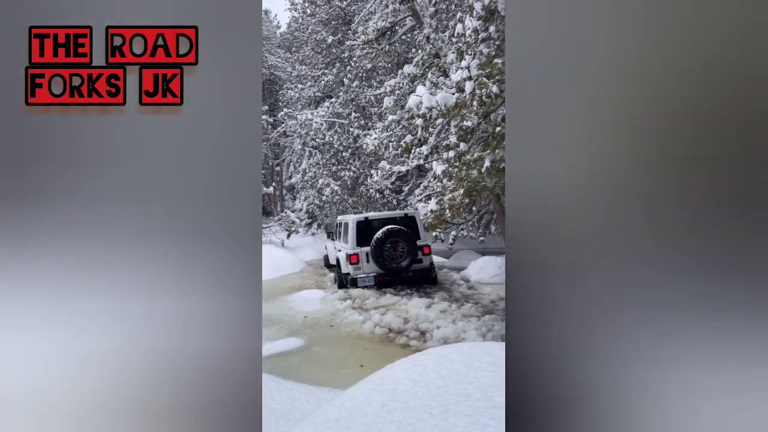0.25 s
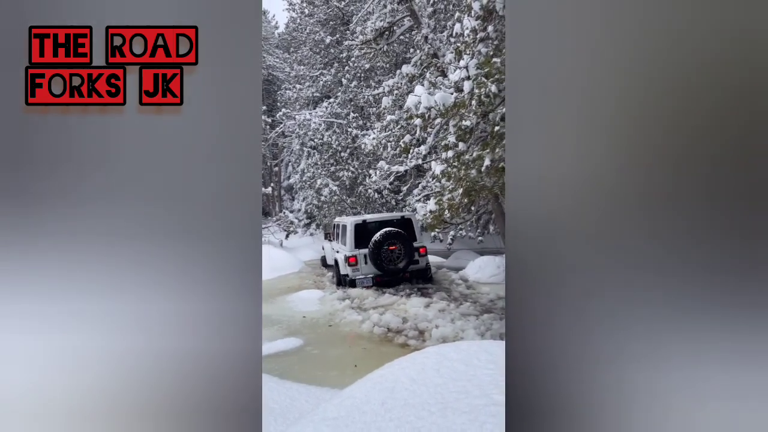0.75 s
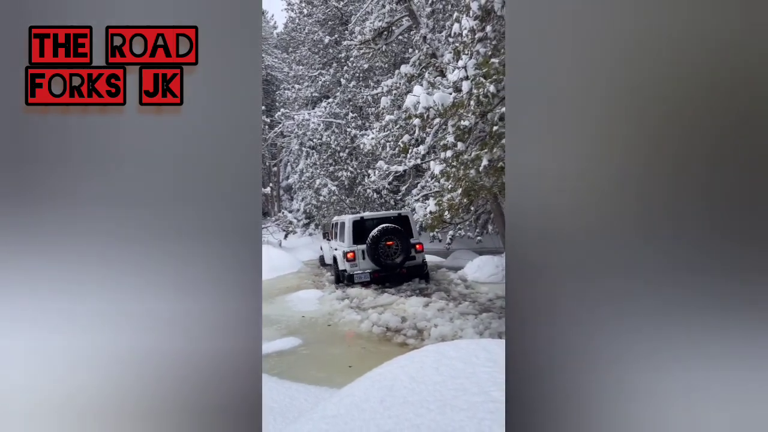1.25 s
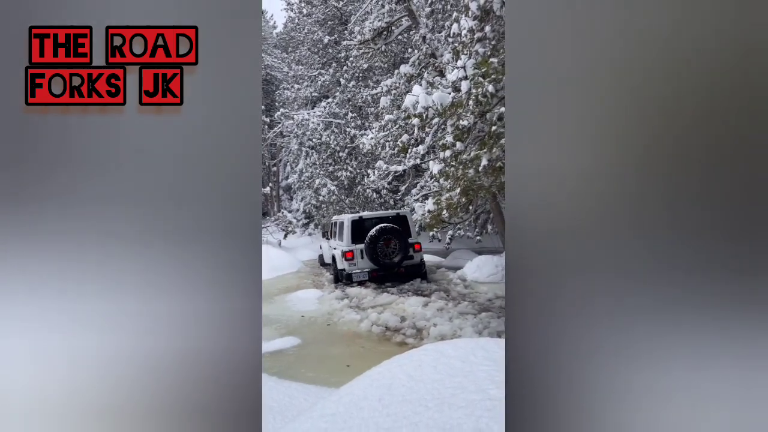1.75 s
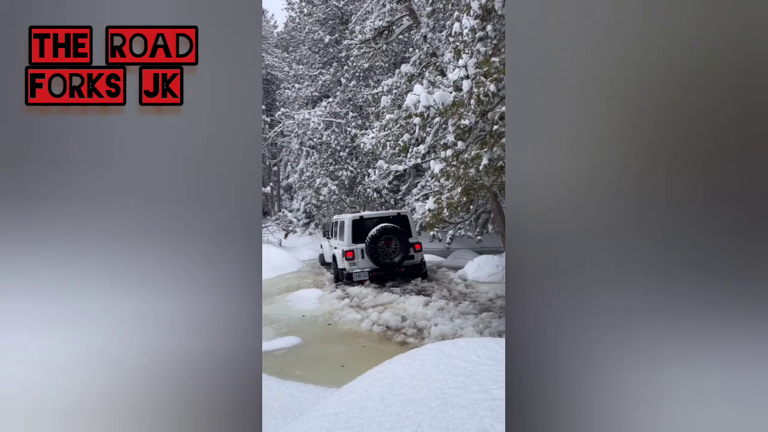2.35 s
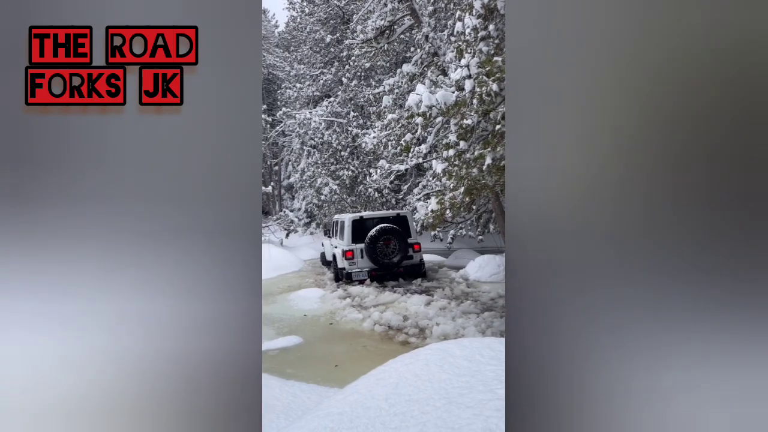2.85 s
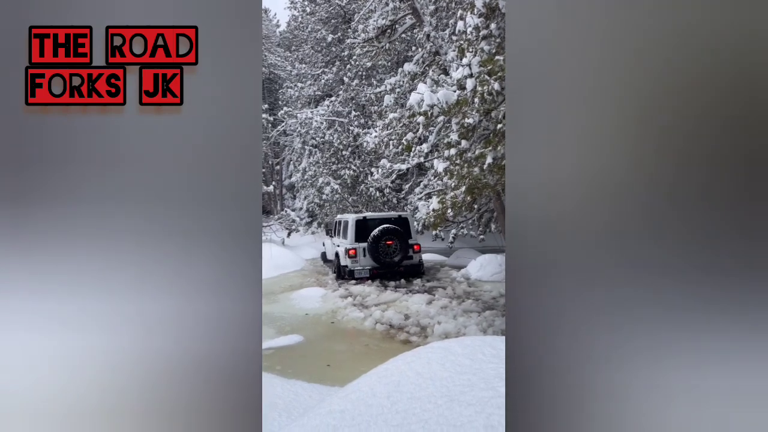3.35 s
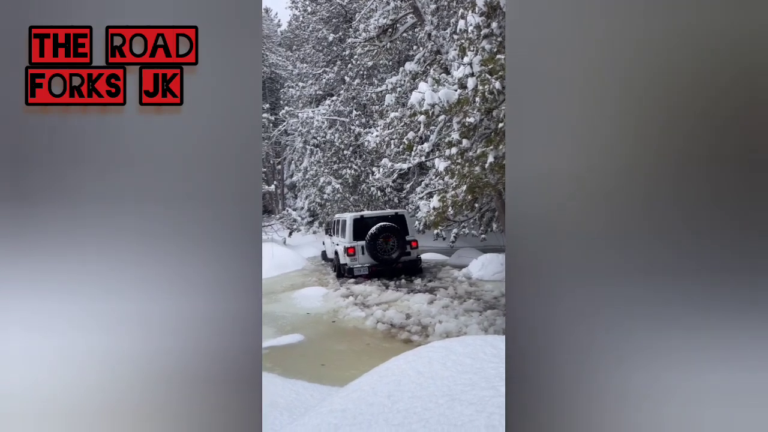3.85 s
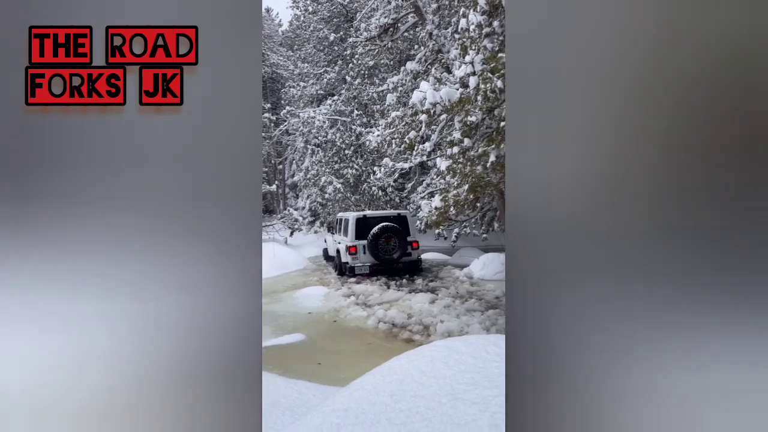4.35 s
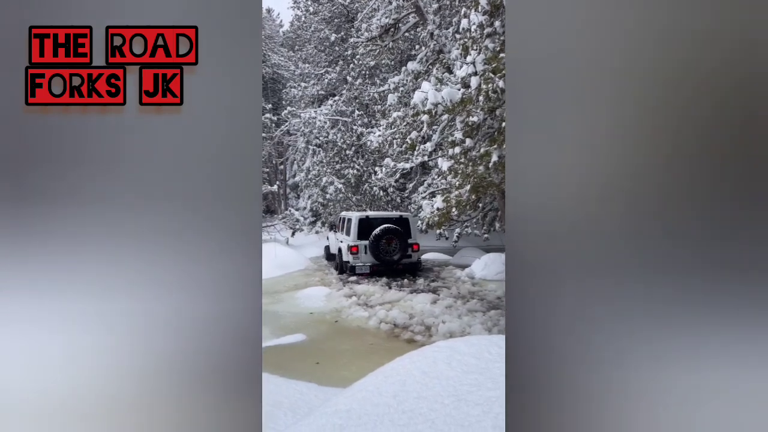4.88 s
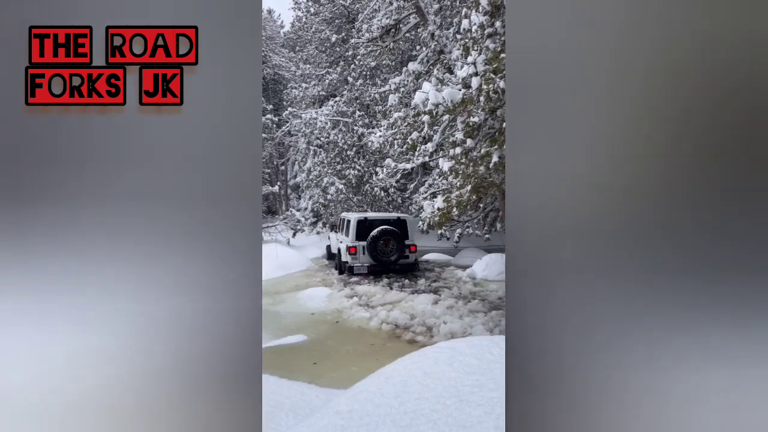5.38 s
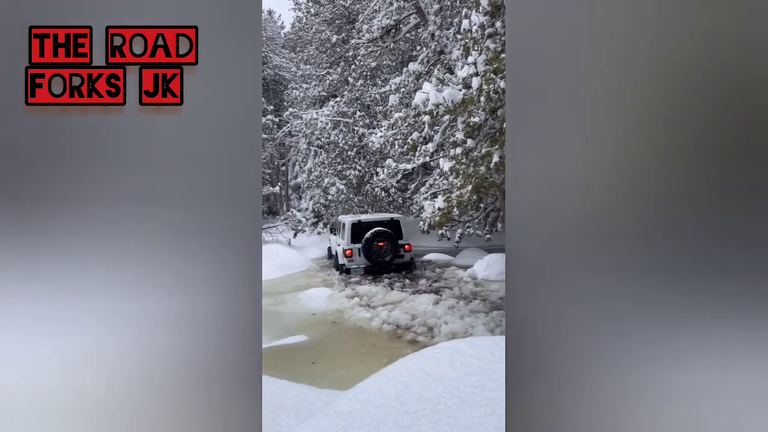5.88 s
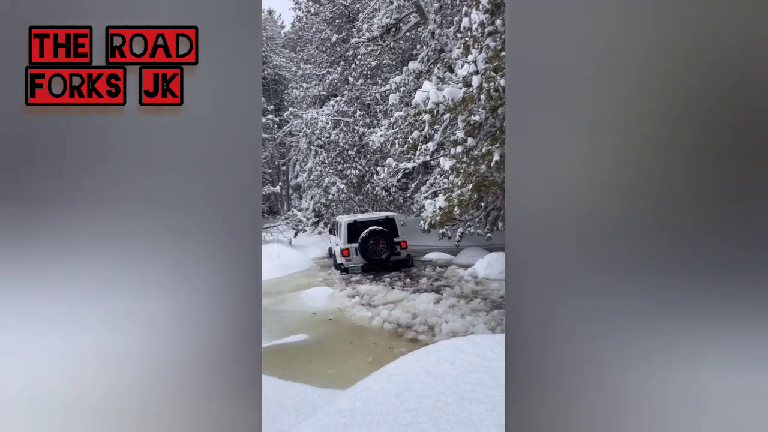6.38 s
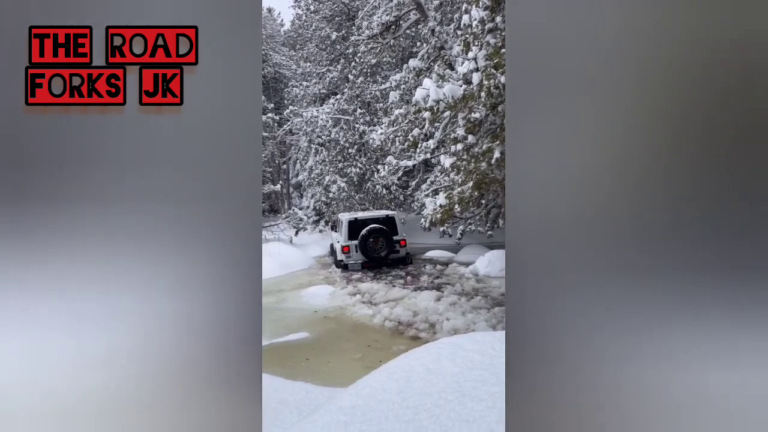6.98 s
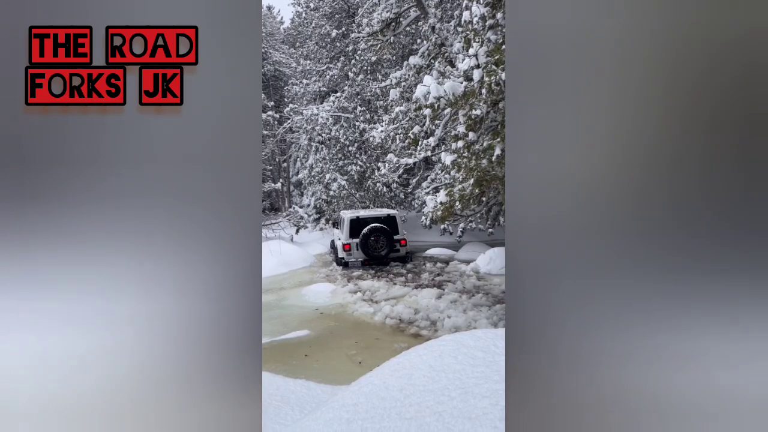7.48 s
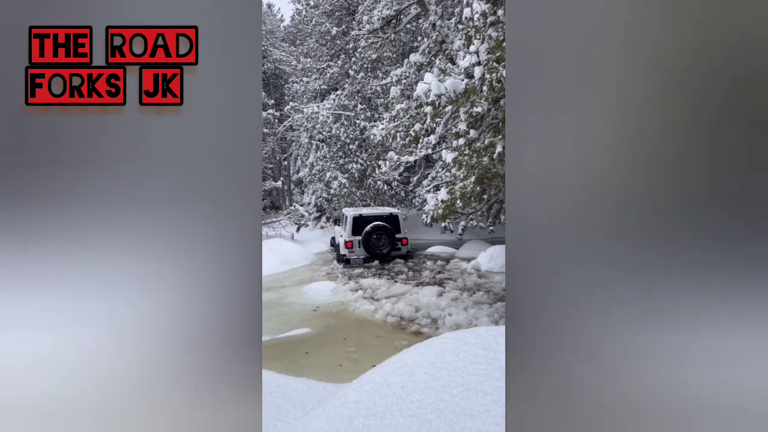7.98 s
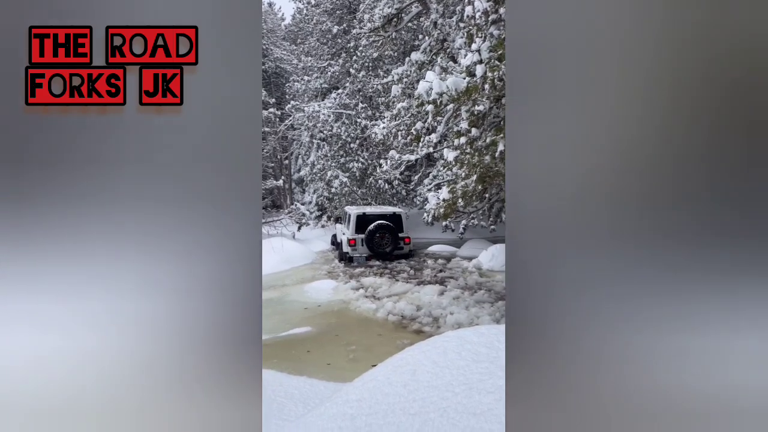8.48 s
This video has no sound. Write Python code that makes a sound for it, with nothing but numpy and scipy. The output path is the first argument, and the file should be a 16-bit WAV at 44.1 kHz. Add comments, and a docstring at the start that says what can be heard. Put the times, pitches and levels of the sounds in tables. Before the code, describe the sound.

Heard from behind in snowy woods, an off-road vehicle's low, booming engine rises and falls as it wades through icy water. One strong rev comes early, followed by a surge of splashing, bubbling slush. The engine then labours at lower speed, its exhaust burbling through waves, while broken ice clinks and snaps beneath the drone. A second rev builds at the close.

```python
"""An exhaust booms as a four-wheel-drive crawls along a flooded, half-frozen forest trail.
A pair of microphones stands on the bank behind it. The engine swells and eases, its firings
sounding through the pipe and now and then gurgling under water. The tyres churn slush into
bubbles and throw spray; cavities plop shut, and ice plates knock, clatter and crack.
The snowy trunks return a faint, short echo of the water and ice."""
import sys
import numpy as np
from scipy import signal
from scipy.fft import rfft, irfft, next_fast_len
from scipy.io import wavfile
from scipy.ndimage import uniform_filter1d

SR = 44100
rng = np.random.default_rng(int(sys.argv[2]) if len(sys.argv) > 2 else 0)


def wav_record(signal):
    """Record a signal, one row per channel, as 16-bit PCM in the file named by sys.argv[1]."""
    frames = np.transpose(np.atleast_2d(signal))
    bounded = np.clip(frames, -1, 1)
    # unit amplitude maps onto the largest positive 16-bit level
    quanta = np.round(bounded * 32767).astype(np.int16)
    wavfile.write(sys.argv[1], SR, quanta)


N = 384993
TIME = np.arange(N) / SR
FFT_SIZE, TAPS = next_fast_len(N + 8192), 16384
BIN_HZ = np.arange(FFT_SIZE // 2 + 1) * SR / FFT_SIZE
FILTER_HZ = np.arange(TAPS // 2 + 1) * SR / TAPS


# The crank. Each row: time in seconds, turns per second.
CRANK_SPEED = [(0, 30.45), (0.08, 29.78), (0.2, 31.6), (0.45, 31.85), (0.58, 29.88), (0.72, 28.52),
               (0.97, 29.14), (1.1, 28.01), (1.25, 26.64), (1.45, 25.23), (1.9, 24.38), (2.03, 26.14),
               (2.15, 28.88), (2.3, 34.68), (2.45, 39.01), (2.56, 42.2), (2.72, 42.77), (2.82, 43.43),
               (2.92, 42.62), (3.03, 39.16), (3.15, 35.53), (3.35, 30.28), (3.52, 26.71), (3.7, 25.34),
               (4.0, 25.73), (4.15, 26.92), (4.3, 30.3), (4.45, 31.09), (4.7, 29.34), (4.95, 28.53),
               (5.15, 26.14), (5.35, 27.25), (5.6, 28.4), (5.9, 29.0), (6.1, 28.18), (6.3, 27.68),
               (6.55, 29.16), (6.75, 28.82), (6.95, 27.2), (7.2, 26.37), (7.5, 29.71), (7.8, 31.16),
               (8.0, 31.74), (8.2, 33.32), (8.35, 36.75), (8.55, 42.07), (8.73, 44.72)]
# The low exhaust note, weaker where the tailpipe sinks. Each row: time in seconds, relative level in dB.
BOOM = [(0.0, -32.5), (0.7, -34.5), (1.05, -33.5), (1.55, -38), (2.0, -38), (2.22, -33), (2.45, -36),
        (2.8, -31), (3.15, -38.5), (3.4, -38), (3.9, -40.5), (4.35, -37), (4.85, -37), (5.15, -38.5),
        (5.6, -37), (5.95, -41.5), (6.35, -41.5), (6.75, -36), (7.3, -47.5), (8.1, -43), (8.45, -44),
        (8.65, -42)]
# The throttle, heard as the bark of the upper orders. Each row: time in seconds, relative level in dB.
BARK = [(0.0, -33.5), (0.55, -34), (1.0, -36), (1.3, -40), (1.85, -42), (2.25, -36), (2.75, -26.5),
        (3.2, -33), (3.55, -40), (4.0, -40.5), (4.3, -34.5), (4.8, -34.5), (5.2, -41), (5.85, -35.5),
        (6.3, -39.5), (6.65, -39), (7.25, -43.5), (7.55, -39), (8.15, -42), (8.32, -38.5), (8.65, -30.5)]
# Water at the tailpipe. Each row: time in seconds, strength of the gurgle in dB.
GURGLE = [(0, -20), (1.7, -19), (2.25, -22), (2.85, -21), (3.03, -10), (3.25, -17), (3.7, -15), (4.6, -19),
          (5.4, -15), (6.1, -11), (6.6, -13), (7.1, -10.5), (8.1, -12), (8.4, -18), (8.7, -20)]
# The tail drops into deeper water. Each row: time in seconds, share of the silencer submerged.
SUBMERSION = [(5.0, 0.018), (5.7, 0.9)]

def engine(cruise_turns_per_s=30, puff_depth=0.45):
    """Speed, throttle and water shape the exhaust note and three noises that puff once a turn."""
    speed, boom_db, bark_db, gurgle_db, submerged = (
        curves(table)[0] for table in (CRANK_SPEED, BOOM, BARK, GURGLE, SUBMERSION))
    revs = np.log2(speed / cruise_turns_per_s)  # octaves above cruising
    crank = 2 * np.pi * np.cumsum(speed) / SR
    note = exhaust(speed, revs, crank, boom_db, bark_db, gurgle_db, submerged)
    gas, shaking, air = rng.standard_normal((3, N)) * (1 + puff_depth * np.cos(crank))
    tailpipe = note * from_db(waves(lag_s=0)) + burble(gas, bark_db + gurgle_db, boom_db)
    return tailpipe + intake_roar(air, revs, submerged) + underbody(shaking)


# Pipe and silencer, in air and under water. Each row: frequency in Hz, gain in dB.
PIPE_IN_AIR = [(22, -15), (40, 4.5), (60, 21), (82, 9), (96, 4.5), (105, -10), (116, 0), (128, 4),
               (150, -5), (175, 0), (205, -6.5), (238, -6), (275, -31), (335, -22.5), (400, -37),
               (470, -24), (520, -31), (580, -23), (660, -29.5)]
PIPE_SUNK = [(22, -17.5), (40, 11), (60, 20), (82, 7.5), (96, 12), (106, -10), (120, -10.5), (130, -3),
             (150, -6), (175, 3.5), (205, -8), (238, -6), (275, -27), (345, -19), (400, -31), (480, -25),
             (580, -33)]

def exhaust(speed, revs, crank, boom_db, bark_db, gurgle_db, submerged, rasp_hz=234):
    """Unequal firings, two a turn, give tones at multiples (orders) of crank speed; the pipe shapes them."""
    in_air, sunk = log_response(PIPE_IN_AIR), log_response(PIPE_SUNK)

    def tone(order, db, waver):
        """One order heard through the pipe, its strength wavering."""
        hz = order * speed
        pipe = (1 - submerged) * np.interp(hz, FILTER_HZ, in_air)
        pipe += submerged * np.interp(hz, FILTER_HZ, sunk)
        # the low orders join into a pulse; the high ones arrive by many paths, out of step
        path_phase = rng.uniform(0, 2 * np.pi) * (order > 7)
        gain = from_db(db) * np.exp(pipe.real) * (1 + waver * drift(6.3))
        return gain * np.cos(order * crank + pipe.imag + path_phase)

    lope_db = -21 + 8 * revs  # the two cylinder banks differ
    drone_db = 20 * revs
    low_orders = [(1, -6.5), (1.5, lope_db), (2, 0), (2.5, lope_db), (3, drone_db)]
    note = sum(tone(order, boom_db + db, waver=.04) for order, db in low_orders)
    uneven_db = bark_db + 1.2 * drift(33)  # no two firings are equally strong
    # the upper orders harden with revving and waver as water reaches the pipe
    for order in range(4, 16):
        rasp_db = 4 * revs * np.minimum(order * speed / rasp_hz, 1) ** 2
        note += tone(order, uneven_db + rasp_db, waver=from_db(gurgle_db))
    # the cylinders differ, so the pattern repeats every second turn: half orders growl
    for order in np.arange(3.5, 14):
        growl_db = -22 + 15 * revs * np.minimum(order * speed / rasp_hz, 1.5) ** 2
        note += tone(order, bark_db + growl_db, waver=.5)
    return note


# Runs of waves over the tailpipe. Each row: centre in seconds, muffling in dB before the rebound,
# build and fade times in seconds.
WAVE_RUNS = [(6.326, 5.5, 0.062, 0.26), (7.463, 7, 0.26, 1)]

def waves(lag_s, period_s=.1355, rebound=1.25):
    """Evenly spaced waves choke the pipe, and the held gas comes out louder in between; gain in dB."""
    choke_db = 0
    for centre, depth_db, build_s, fade_s in WAVE_RUNS:
        crests = np.abs(np.cos(np.pi * (TIME - centre - lag_s) / period_s)) ** 2.4
        choke_db += depth_db * crests * swell(centre, np.where(TIME < centre, build_s, fade_s))
    return rebound * uniform_filter1d(choke_db, size=12000) / 2 - choke_db


# Gas bubbling at the tailpipe. Each row: frequency in Hz, relative level in dB.
BURBLE_SPECTRUM = [(25, -30), (60, -22), (110, 18.5), (170, 8.5), (235, 1), (280, 3), (340, -22),
                   (400, -41), (480, -12), (600, -37), (800, -24), (1500, -43.5)]

def burble(gas, bubbling_db, boom_db, usual_boom_db=-36):
    """Gas bursts through the water in puffs, following a little of the boom's swing."""
    level_db = bubbling_db + 3 + 0.13 * (boom_db - usual_boom_db)
    return from_db(level_db) * colour(gas, BURBLE_SPECTRUM)


# Intake and fan, at the far end of the vehicle. Each row: frequency in Hz, relative level in dB.
ROAR_SPECTRUM = [(200, -9.5), (280, -7), (380, 6), (460, 6.5), (580, 3.5), (720, -19), (1200, -21.5)]

def intake_roar(air, revs, submerged, db_per_octave=20.5, sunk_db=-3):
    """The intake and fan roar louder as the engine revs; deep water muffles them."""
    return from_db(-64 + db_per_octave * revs + sunk_db * submerged) * colour(air, ROAR_SPECTRUM)


# Tyres in the flooded trail. Each row: time in seconds, relative levels of churn and spray in dB.
TYRE_LEVELS = [(0, -59.5, -75), (0.48, -53, -72), (0.68, -48, -67.5), (0.88, -49.5, -69),
               (1.05, -48, -66.5), (1.45, -56.5, -74.5), (2.15, -58.5, -81), (2.45, -55, -85),
               (2.98, -44.5, -66.5), (3.22, -41.5, -64.5), (3.37, -46, -63), (3.51, -42, -61.5),
               (3.85, -50, -68.5), (4.35, -55.5, -73), (5.45, -53.5, -76), (5.95, -49.5, -66.5),
               (6.55, -53, -74.5), (7.2, -54.5, -71.5), (7.5, -53.5, -76.5), (8.05, -56, -79.5),
               (8.45, -51, -74.5), (8.73, -54, -84)]

def tyres(wave_share=0.75):
    """Slush and spray surge with the waves that cover the tailpipe, a little later."""
    churn_db, spray_db = curves(TYRE_LEVELS)
    sloshing = from_db(wave_share * waves(lag_s=0.05))
    return (slush(churn_db) + spray(spray_db)) * sloshing


# Churned slush. Each row: frequency in Hz, relative level in dB.
CHURN_SPECTRUM = [(200, -6), (400, 0.5), (620, 4.5), (900, -0.5), (1400, -4.5), (1900, -4), (2700, -11.5),
                  (4000, -15), (7000, -28)]

def slush(churn_db, bubbles_per_s=900, ring_cycles=20):
    """Tyres stir a flickering wash of water, full of short bubbles and jostling ice crumbs."""
    clicks = grains(bubbles_per_s * from_db(1.5 * drift(7.7)), spread_db=3.5)
    pitches = np.geomspace(430, 3800, 16)
    pitch_index = rng.integers(0, len(pitches), N)
    bubbles = np.zeros(N)
    for k, hz in enumerate(pitches):
        ringing = ring(clicks * (pitch_index == k), hz, ring_cycles / hz)
        bubbles += ringing * hz * from_db(at_hz(CHURN_SPECTRUM, hz))
    wash = colour(rng.standard_normal(N), CHURN_SPECTRUM) * from_db(2.35 * drift(22))
    return from_db(churn_db) * (from_db(-0.2) * wash + from_db(-2.95) * rms_one(bubbles))


# Flying drops and mist, as the microphones hear them, with their treble lifted near 11 kHz. Each row: frequency
# in Hz, relative level in dB.
SPRAY_SPECTRUM = [(1500, -17), (3000, 8), (3900, -2.5), (4500, 9), (5600, 7), (6700, -1), (8200, 7),
                  (9500, 3), (10700, 15.5), (11600, 5.5), (12000, -25), (12600, -13.5)]

def spray(spray_db, drops_per_s=2200, width=.45):
    """Thrown drops and crushed wet snow fizz, spread wide so each microphone hears its own mix."""
    impacts = grains(drops_per_s, spread_db=1.0) * (1 + width * rng.standard_normal((2, N)))
    mist = rng.standard_normal(N) + width * rng.standard_normal((2, N))
    drops = from_db(10) * colour(impacts, SPRAY_SPECTRUM)
    hiss = from_db(4.5) * colour(mist, SPRAY_SPECTRUM)
    flicker_db = 1.8 * drift(29)
    return from_db(spray_db + flicker_db) * (drops + hiss)


# Water and ice closing behind the tyres. Each row: start in seconds, relative level in dB,
# pitch in Hz, t60 in seconds.
PLOPS = [(0.557, -39, 544, .06), (0.657, -30, 742, 0.07), (0.671, -27.5, 292, 0.045),
         (0.702, -30.5, 724, 0.07), (0.724, -32.5, 610, .05), (0.803, -32, 613, 0.094),
         (2.736, -30, 566, 0.075), (3.0, -27, 290, 0.054), (3.008, -26.5, 490, 0.03),
         (3.154, -32, 614, .035), (3.315, -43, 620, .05), (3.462, -31, 605, 0.091),
         (3.794, -25.5, 553, 0.034), (5.519, -36, 815, 0.062), (5.746, -33, 660, 0.059),
         (5.99, -31, 483, 0.044), (6.692, -35, 510, 0.034), (6.753, -36, 627, .03),
         (6.773, -27, 330, 0.034), (6.78, -37.5, 560, 0.03), (7.053, -34, 300, .06),
         (7.448, -39, 650, 0.069), (7.811, -35, 646, 0.058)]

def plops(gain_db=0.5, bubbling=.07):
    """A cavity closes: its air rings hollowly, with two weaker neighbours and a bubbling tail."""
    out, t = np.zeros(N), TIME[:6000]
    for start, db, hz, t60 in PLOPS:
        push = bubbling * rng.standard_normal(len(t)) * decay(t, t60=.1)
        push[0] += 1
        neighbours = ring(push, hz * 0.98, t60 / 2) + ring(push, hz * 1.313, t60 / 2)
        plop = ring(push, hz, t60) + .7 * neighbours
        add(out, start, from_db(db + gain_db) * plop / np.abs(plop).max())
    return out


# Ice plates knocking together. Each row: start in seconds, relative level in dB, pitch in Hz,
# t60 of that pitch in seconds.
KNOCKS = [(0.602, -31, 1860, .03), (5.7403, -38, 980, 0.026), (5.8123, -30.5, 2030, 0.052),
          (5.882, -33.5, 1960, 0.034), (5.923, -33, 1150, 0.013), (5.9885, -30.5, 1820, .006),
          (6.02, -35, 880, .02), (6.035, -36, 900, 0.018), (6.129, -36, 1000, 0.033),
          (6.168, -39, 1400, .02), (6.2024, -31, 1110, 0.019), (6.2711, -38, 900, 0.016),
          (6.309, -32, 1630, 0.028), (6.3456, -33.5, 1900, 0.019), (6.42, -32.5, 1480, 0.034),
          (6.448, -38, 1230, .02), (6.7543, -33, 870, 0.023), (7.053, -34.5, 970, .03),
          (7.094, -36, 2010, 0.026), (7.1621, -35.5, 1200, 0.033), (7.2026, -37, 910, .04),
          (7.2365, -39, 1170, .02), (7.272, -30.5, 1650, .08), (7.3807, -40, 1110, 0.035),
          (7.4178, -35, 1097, 0.13), (7.437, -49, 1170, 0.045), (7.455, -54, 1000, .02),
          (7.5198, -35, 1870, 0.055), (7.5502, -34, 1640, 0.026), (7.574, -36, 1280, .03),
          (7.6819, -37.5, 1140, 0.033), (7.785, -32, 1530, 0.0089), (7.8115, -41, 1300, 0.018),
          (7.8337, -40, 855, .04), (7.846, -38, 1780, .04), (7.9594, -40.5, 1500, 0.033),
          (8.078, -54, 1200, .02), (8.217, -39, 1000, .03), (8.357, -37, 940, 0.047),
          (8.381, -36, 1260, 0.037), (8.532, -37, 1260, .03)]
# Modes of the broken ice. Each row: frequency in Hz, relative level in dB.
ICE_MODES = [(680, 0.5), (1020, -2.5), (1250, -3), (1650, -7), (1950, -5), (2350, -9), (3050, -6.5),
             (3750, -12.5), (4300, -16), (5550, -13), (6100, -18.5)]

def ice_knocks(gain_db=-13.5, crunch=.012):
    """A plate is hit hard and crunches on; it rings at its own pitch and in the modes of the ice."""
    out, t = np.zeros(N), TIME[:6000]
    for start, db, hz, t60 in KNOCKS:
        contact = crunch * rng.standard_normal(len(t)) ** 3 * decay(t, t60=0.085)
        contact[0] += 1
        knock = from_db(4) * ring(contact, hz, t60)
        mode_t60 = np.sqrt(t60 * 0.048)  # a plate choked by slush damps the other modes too
        for mode_hz, mode_db in ICE_MODES:
            strength = rng.choice([-1, 1]) * from_db(mode_db + rng.normal(0, 1.8))
            knock += strength * ring(contact, mode_hz * rng.normal(1, 0.0436), mode_t60)
        add(out, start, from_db(db + gain_db) * knock / np.std(knock[t < .02]))
    return out


def ice_clatter(start_s=5.55, end_s=7.85, ticks_per_s=42, gain_db=-46):
    """On a stretch of broken ice, small pieces tick together and ring briefly in the same modes."""
    clicks = grains(ticks_per_s, spread_db=2.0) * (TIME > start_s) * (TIME < end_s)
    return sum(from_db(gain_db + db) * ring(clicks * (rng.random(N) - .5), hz, t60=.016)
               for hz, db in ICE_MODES)


# Thin ice breaking on the trail. Each row: start in seconds, relative level in dB, t60 in seconds.
CRACKS = [(0.5017, -52, 0.12), (1.222, -52, 0.096), (1.7971, -39, 0.054), (1.803, -37, 0.056),
          (4.9, -51.5, 0.056), (5.0817, -45.5, 0.04), (5.562, -50, 0.24), (5.61, -41, 0.057),
          (5.669, -49, 0.1), (5.9885, -51, 0.025), (6.696, -54, 0.23), (6.7533, -49, 0.087),
          (7.238, -50.5, 0.081), (7.7839, -40, 0.02)]
# One snap. Each row: frequency in Hz, relative level in dB.
SNAP_SPECTRUM = [(700, -25), (1200, -5), (1800, 2), (2800, 7), (4000, 4.5), (5500, 5), (7000, 1),
                 (10000, 7), (12500, 3)]

def ice_cracks(gain_db=19.5, first_snap=11):
    """A fracture opens with one sharp snap and runs through thin ice as a burst of tiny ones."""
    out, t = np.zeros(N), TIME[:4000]
    ice = impulse_response(SNAP_SPECTRUM)[:len(t)]
    for start, db, t60 in CRACKS:
        snaps = rng.standard_normal(len(t)) ** 3 / 3 * decay(t, t60)
        snaps[0] += first_snap
        burst = signal.fftconvolve(snaps, ice)[:len(t)]
        add(out, start, from_db(db + gain_db) * burst / np.abs(burst).max())
    return out


# Loaded tyres and drivetrain. Each row: centre in seconds, half length in seconds, level in dB.
GROANS = [(6.008, 0.089, -43), (6.443, 0.12, -53.5), (7.412, 0.17, -55), (7.762, 0.14, -53.5)]

def groans():
    """Under load a rough rubbing swells and fades in one narrow resonance."""
    rubbing = rms_one(ring(rng.standard_normal(N), hz=667, t60=0.13))
    return rubbing * sum(from_db(db) * swell(centre, half_s) for centre, half_s, db in GROANS)


# Resonances of the underbody. Each row: frequency in Hz, t60 in seconds, relative level in dB.
BODY_MODES = [(284, 0.05, -71.5), (309.7, 0.069, -59.5), (337.7, 0.13, -59.5), (377, 0.14, -68.5),
              (490, 0.35, -65)]
# The rise and fall of its hum. Each row: time in seconds, gain in dB.
HUM_GAIN = [(0, 2.5), (1.0, 2.5), (1.4, -0.5), (2.0, -1.5), (2.4, 2), (3.7, 2), (4.35, 5.5), (5.2, 2),
            (5.85, 6), (6.7, 5.5), (7.3, -1.5), (8.3, -1), (8.65, 4)]

def underbody(shaking):
    """The engine shakes the underbody, which hums in its resonances."""
    hum = sum(from_db(db) * rms_one(ring(shaking, hz, t60)) for hz, t60, db in BODY_MODES)
    return from_db(curves(HUM_GAIN)[0]) * hum


# What the trees send back to the bank. Each row: frequency in Hz, gain in dB.
TREE_SCATTER = [(250, -19), (500, -11), (1000, -22), (2000, -18), (4000, -9), (10000, -20)]

def forest(sound, t60=0.028, delay_s=.008):
    """Snowy trunks add a faint, short tail, different at each microphone."""
    t = TIME[:8000]
    tail = rng.standard_normal((2, len(t))) * decay(t, t60) * (t > delay_s)
    tail /= np.sqrt(np.sum(tail ** 2, axis=1, keepdims=True))
    return sound + filtered(sound, rfft(tail, FFT_SIZE) * from_db(at_hz(TREE_SCATTER, BIN_HZ)))


def from_db(db):
    """Decibels to gain."""
    return 10 ** (np.asarray(db) / 20)


def decay(t, t60):
    """A fade that falls 60 dB in t60 seconds."""
    return from_db(-60 * t / t60)


def rms_one(x):
    """Scale to rms 1."""
    return x / np.sqrt(np.mean(x ** 2) + 1e-20)


def curves(rows):
    """One curve for each column after the time, joined by straight lines."""
    times, *columns = np.transpose(rows)
    return [np.interp(TIME, times, column) for column in columns]


def at_hz(rows, hz):
    """Read a table on a log-frequency axis."""
    table = np.array(rows)
    return np.interp(np.log(hz + 1e-9), np.log(table[:, 0]), table[:, 1])


def drift(rate_hz, hop=40):
    """A slow random wander with a spread of about 1."""
    pole = np.exp(-2 * np.pi * hop * rate_hz / SR)
    noise = rng.standard_normal(N // hop + 2002)
    slow = signal.lfilter([1], [1, -2 * pole, pole * pole], noise)[2000:]
    return np.interp(np.arange(N) / hop, np.arange(len(slow)), rms_one(slow))


def log_response(spectrum):
    """Log gain (real part) and phase (imaginary part) of the causal filter with this spectrum."""
    cepstrum = irfft(np.log(from_db(at_hz(spectrum, FILTER_HZ))), TAPS)
    return rfft(np.r_[cepstrum[0], 2 * cepstrum[1:TAPS // 2]], TAPS)


def impulse_response(spectrum):
    """A click through the causal filter with this spectrum."""
    return irfft(np.exp(log_response(spectrum)), TAPS)[:TAPS // 2]


def filtered(x, response):
    """Apply one complex gain per frequency bin."""
    return irfft(rfft(x, FFT_SIZE) * response, FFT_SIZE)[..., :N]


def colour(x, spectrum):
    """Give a sound a spectrum; rms 1."""
    return rms_one(filtered(x, rfft(impulse_response(spectrum), FFT_SIZE)))


def ring(clicks, hz, t60):
    """A unit click sets a sine of height 1 ringing."""
    radius, angle = decay(1 / SR, t60), 2 * np.pi * hz / SR
    return signal.lfilter([0, np.sin(angle)], [1, -2 * radius * np.cos(angle), radius ** 2], clicks + 1e-18)


def swell(centre_s, half_s):
    """A smooth hump of height 1."""
    return np.exp(-np.minimum(((TIME - centre_s) / half_s) ** 2, 50))


def add(out, start_s, sound):
    """Mix in a short sound."""
    start = max(int(start_s * SR), 0)
    out[start:start + len(sound)] += sound[:N - start]


def grains(per_s, spread_db):
    """Random clicks, a few of them larger than the rest."""
    sizes = from_db(spread_db * np.minimum(rng.exponential(1, N), 4)) * rng.choice([-1, 1], N)
    return sizes * (rng.random(N) < per_s / SR)


def scene():
    """From the bank the vehicle is straight ahead; its water and ice echo among the trees."""
    water = tyres() + plops()
    return engine() + groans() + forest(water + ice_knocks() + ice_clatter() + ice_cracks())


# The microphone pair. Each row: frequency in Hz, phase by which the left one leads in radians.
LEFT_LEAD = [(1900, 0), (2500, .6), (3000, .7), (3300, 1.6), (3950, .9), (4780, 3.14), (5500, 6),
             (6200, 6.3), (8500, 9.2), (9400, 9.5), (9700, 7.5), (10200, 7.3), (11050, 9.4), (11600, 12.4)]

def record(dry, cutoff_hz=12500):
    """The two microphones on the bank part in phase through the treble; the top is cut steeply."""
    phase_shift = np.exp(.5j * at_hz(LEFT_LEAD, BIN_HZ) * np.array([[1], [-1]]))
    lowpass = 1 / np.sqrt(1 + (BIN_HZ / cutoff_hz) ** 160)
    return filtered(dry, phase_shift * lowpass)


dry = scene()
out = record(dry)
wav_record(out)
```